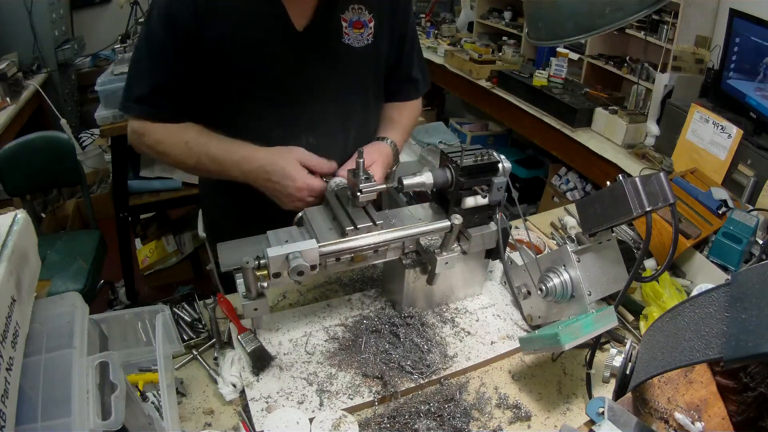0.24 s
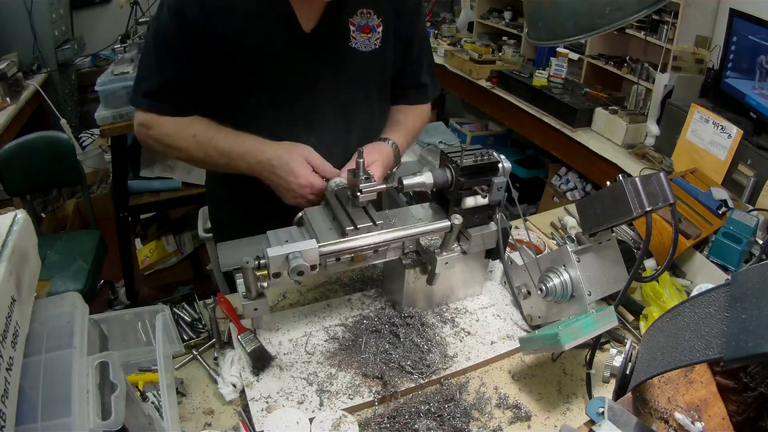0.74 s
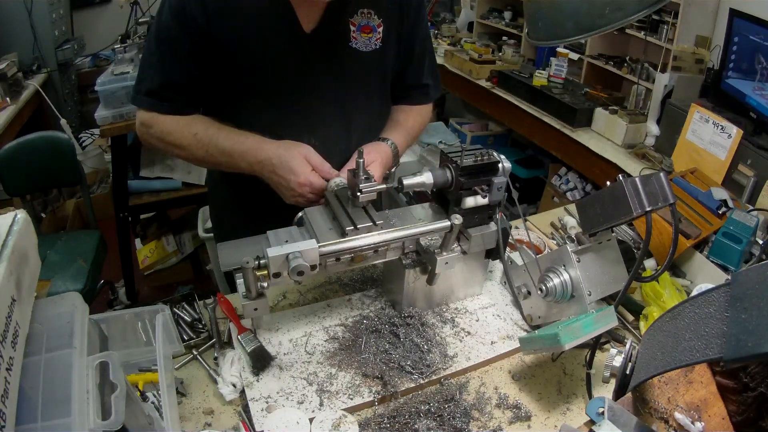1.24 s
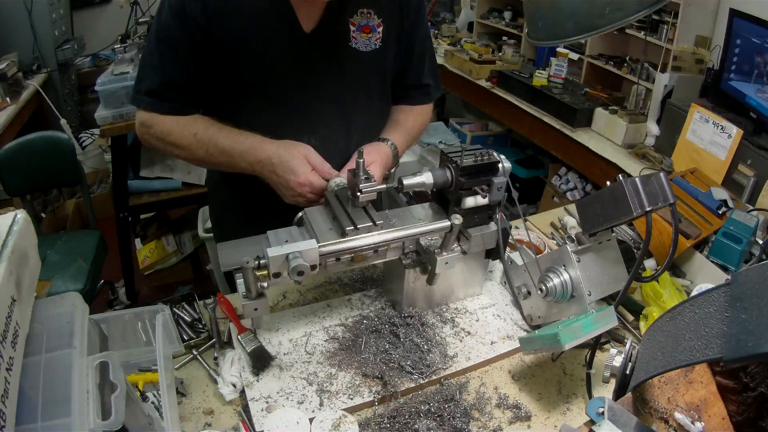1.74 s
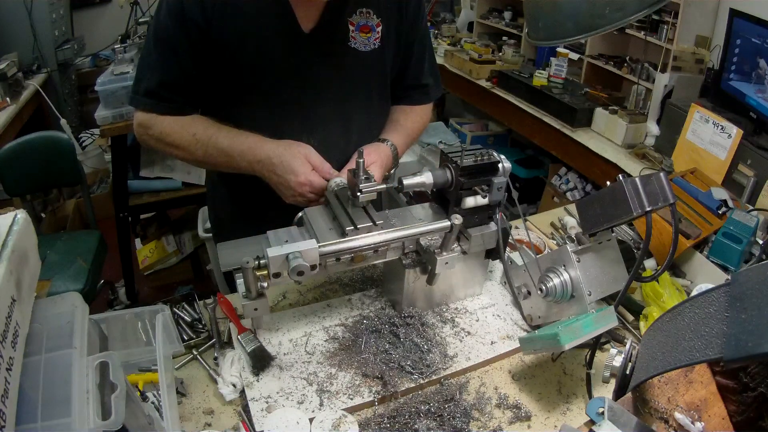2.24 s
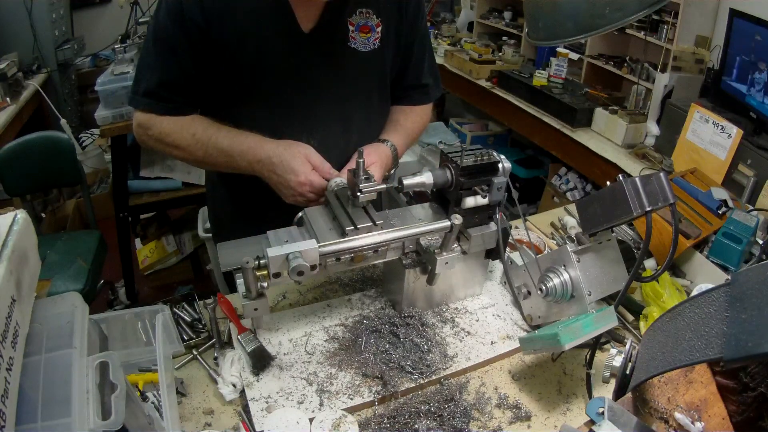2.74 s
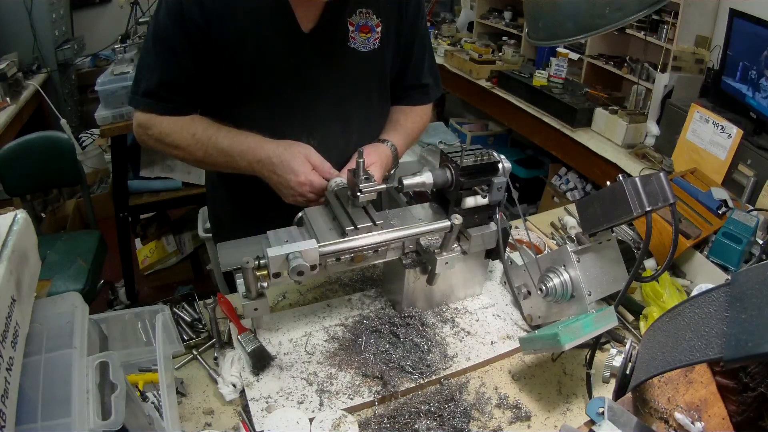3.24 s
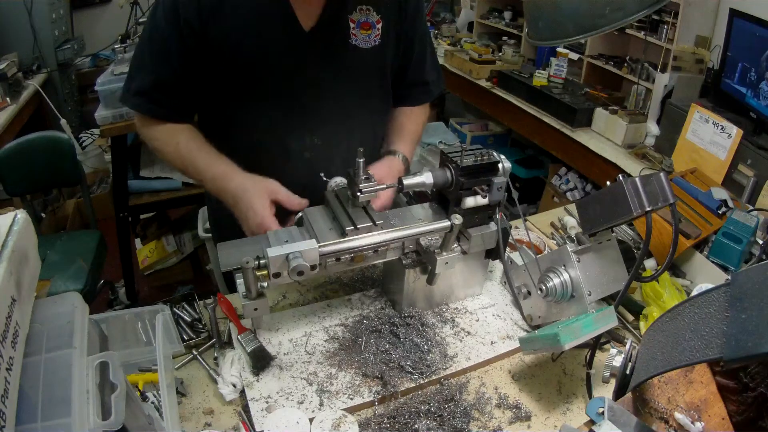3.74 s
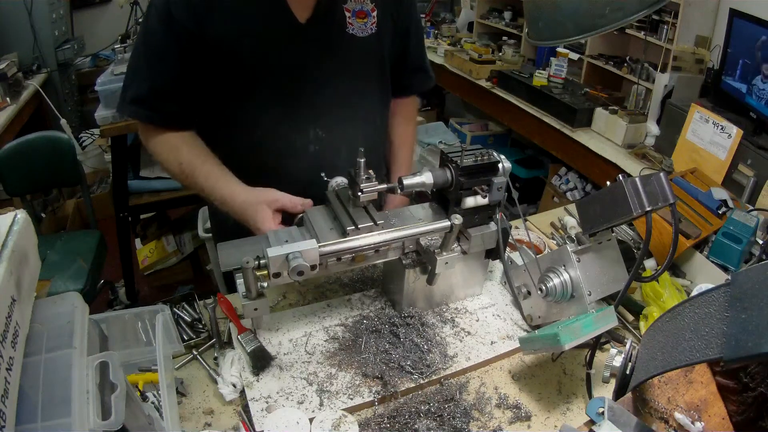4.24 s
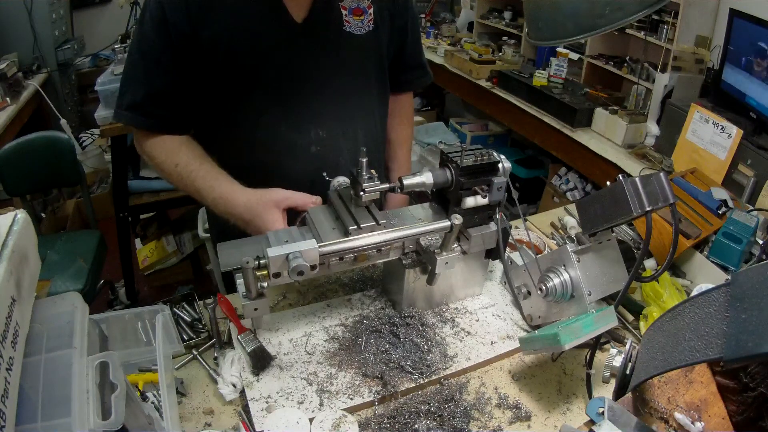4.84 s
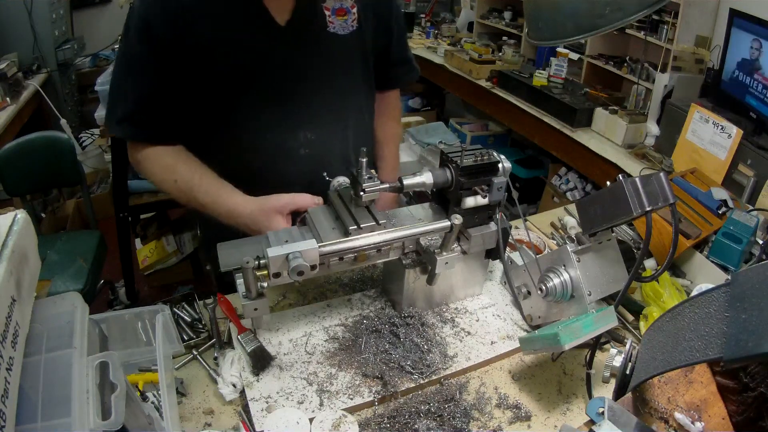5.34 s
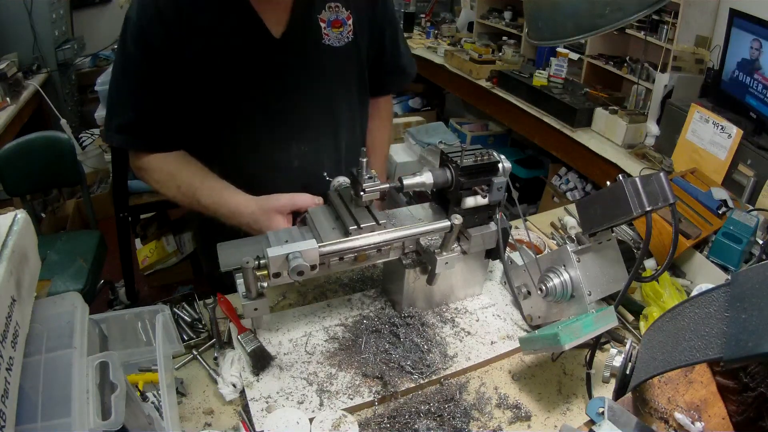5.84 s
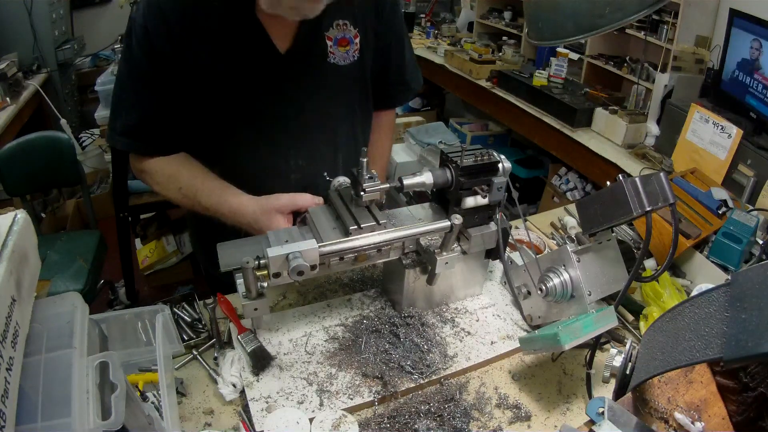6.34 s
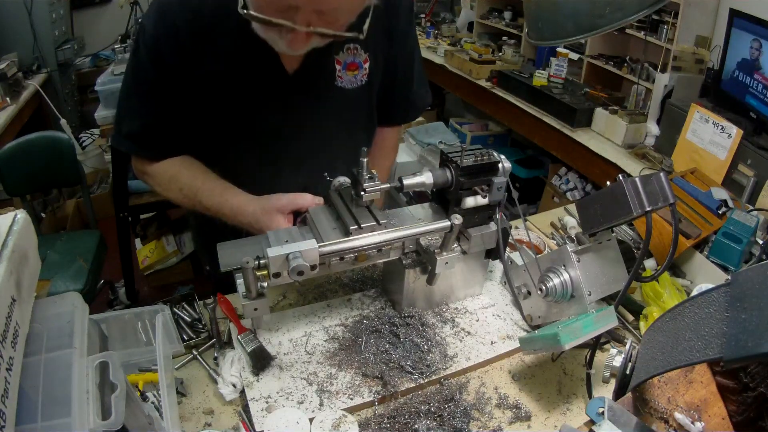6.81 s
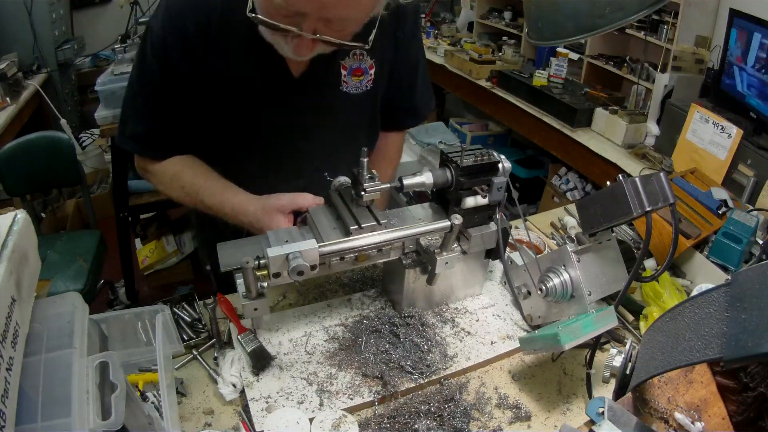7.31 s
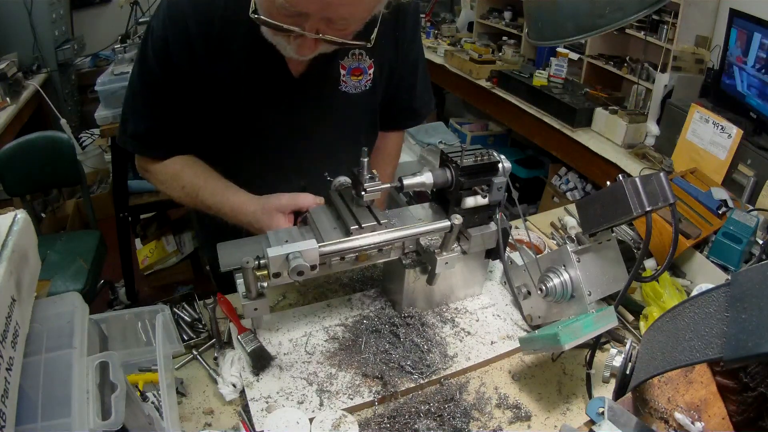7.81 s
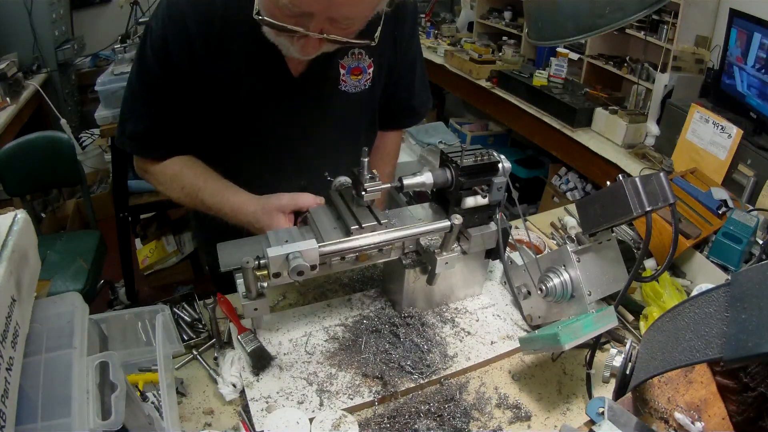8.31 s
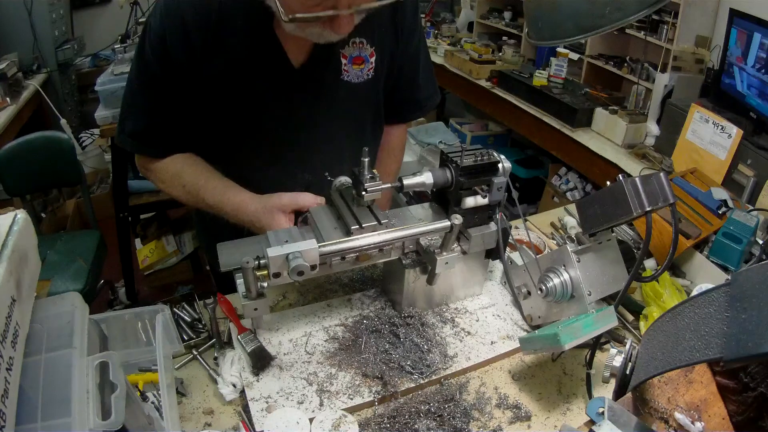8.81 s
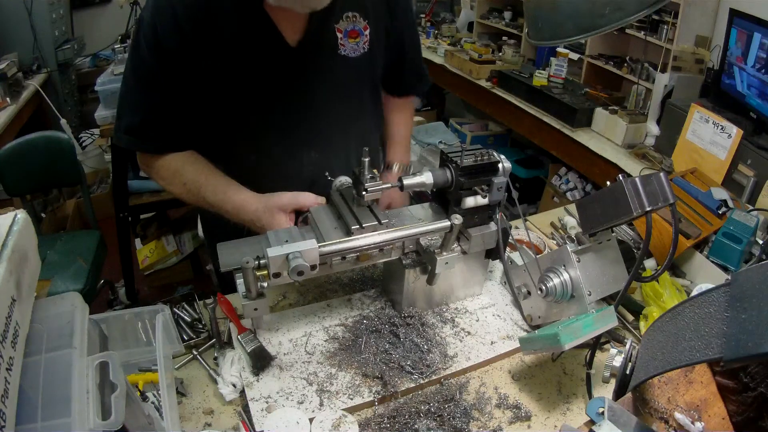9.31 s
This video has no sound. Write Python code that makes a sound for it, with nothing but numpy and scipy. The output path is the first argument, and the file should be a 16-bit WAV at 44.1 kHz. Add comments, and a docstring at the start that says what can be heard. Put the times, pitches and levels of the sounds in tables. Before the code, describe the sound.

Benchtop lathe motor whirring at speed, belt rasping about three times a second, until cutting begins with a loud, bright, sizzling scrape to the end.

```python
"""Home workshop: a small benchtop metal lathe settles at speed, then cuts, light at first and then deeper.
Shaft-locked sines and mains hum lie over filtered brush and bearing noise and a low rumble.
Noise bursts make the belt's scrape once a lap and its slaps; noise through tool modes makes the cut's hiss.
Both microphone ports hear the same sound; the right one loses the bass."""
import sys
import numpy as np
from scipy import signal
from scipy.fft import rfft, irfft, next_fast_len
from scipy.io import wavfile

SR = 44100
rng = np.random.default_rng(int(sys.argv[2]) if len(sys.argv) > 2 else 0)


def wav_out(sig):
    """Save sig, one row per channel (or a flat mono array), as 16-bit PCM at SR to the path in sys.argv[1]."""
    wavfile.write(sys.argv[1], SR, np.round(np.clip(np.atleast_2d(sig).T, -1, 1) * 32767).astype(np.int16))


N = 422037


def amp(db):
    """Decibels to gain."""
    return 10 ** (np.asarray(db) / 20)


def rms_one(x):
    """Scale to rms 1."""
    return x / np.sqrt(np.mean(x ** 2) + 1e-20)


def drift(corner_hz):
    """Slow random wander, rms about 1: noise through two equal one-pole low-passes at SR / 40, interpolated."""
    step, settle = 40, 2000
    pole = np.exp(-2 * np.pi * corner_hz * step / SR)
    noise = rng.standard_normal(N // step + settle + 2)
    slow = signal.lfilter([1], [1, -2 * pole, pole * pole], noise)[settle:]
    return np.interp(np.arange(N) / step, np.arange(len(slow)), rms_one(slow))


def colour(x, spectrum, peaks=(), peaks_db=0):
    """Filter noise by a smooth spectrum, log-interpolated in frequency, plus the power of resonance humps."""
    size = next_fast_len(N)
    hz = np.arange(size // 2 + 1) * SR / size + 1e-3   # offset avoids log(0)
    points = np.array(spectrum)
    level_db = np.interp(np.log(hz), np.log(points[:, 0]), points[:, 1])
    power = amp(level_db) ** 2
    for top_hz, width_hz, peak_db in peaks:
        hump = 1 / (1 + (2 * (hz - top_hz) / width_hz) ** 2) ** 2
        power += amp(peak_db + peaks_db) ** 2 * hump
    return irfft(rfft(x, size) * np.sqrt(power), size)[:N]


def shaft_tones(turns, load, waver_db, runout_rad, settle_db, load_db):
    """Sines locked to the motor turn; spindle run-out shifts the phase of high orders and swells the whine."""
    # tones on multiples of the motor turn: (order, base rms level/dB)
    orders = [(1, -69), (2, -78), (3, -84), (12, -70), (24, -70), (42, -78), (51, -79), (54, -79),
              (56, -77), (84, -57.5), (86, -68), (92, -72), (96, -70), (97, -72), (102, -74), (108, -70),
              (110, -70), (118, -73), (120, -68), (121, -70), (124, -74), (127, -66), (128, -67),
              (130, -61), (131, -68), (132, -64), (135, -64), (136, -60), (137, -70), (140, -70),
              (144, -70), (149, -71), (151, -61), (152, -63.5), (156, -68), (163, -72), (168, -75),
              (180, -73), (182, -80), (186, -80), (187, -78), (188, -74), (216, -84), (244, -91),
              (259, -89), (274, -88)]
    spindle_ratio = .24   # spindle turns per motor turn
    whine_swell_db, beat_db = 2.5, -76.5
    t = np.arange(N) / SR
    spindle = np.sin(2 * np.pi * spindle_ratio * turns)
    # belt beat: motor turn plus spindle turn
    out = np.sqrt(2) * amp(beat_db) * np.sin(2 * np.pi * (1 + spindle_ratio) * turns)
    settling_db = settle_db * np.exp(-t / .27)
    slot_growth_db = -16 * np.exp(-t / 1.8)   # the slot tone emerges slowly
    for order, base_db in orders:
        phase = 2 * np.pi * (order * turns + rng.random())
        level_db = base_db + waver_db * min(order / 310, 1) * drift(6.9)
        if order > 12:
            level_db = level_db + settling_db
        if order == 24:
            level_db = level_db + slot_growth_db
        if order == 84:   # the whine
            level_db = level_db + whine_swell_db * spindle
        if order > 90:
            phase += runout_rad * order / 100 * spindle
        if 90 < order < 200:   # this band fades under load
            level_db = level_db + load_db * load
        out += np.sqrt(2) * amp(level_db) * np.sin(phase)
    return out


def whirr(turns, flicker_db):
    """Brush and bearing noise; part of its treble is rotor roughness, repeated every motor turn."""
    # brushes and bearings: (f/Hz, relative density level/dB)
    brush_spectrum = [(350, -21), (600, -12), (979, -15.5), (1930, -10), (2440, -26.5), (2830, -16),
                      (3380, -4), (4750, -7.5), (5440, -1), (6410, -1), (8410, -16.5), (11700, -22),
                      (15500, -28.5)]
    # motor housing resonances: (f/Hz, width/Hz, level/dB before the hump gain)
    housing = [(2400, 52, -11), (3240, 23, -14), (3470, 45, 0), (3950, 49, -8), (4190, 23, -9),
               (4520, 110, -8), (4970, 48, -7), (5360, 41, -2), (5600, 57, -1), (6240, 52, -2),
               (6760, 49, -9), (7420, 96, -13), (7750, 41, -13), (10670, 40, -24), (11300, 60, -21)]
    # broad humps in the brush noise: (f/Hz, width/Hz, level/dB before the hump gain)
    far_treble = [(8970, 290, -20), (11100, 200, -29), (15000, 500, -32)]
    level_db, hump_gain_db, repeat_db = -50.5, 5, -4
    points_per_turn = 1024
    position = (turns * points_per_turn).astype(int) % points_per_turn
    roughness = rng.standard_normal(points_per_turn)[position]
    band = signal.butter(5, [4000, 13000], "band", fs=SR, output="sos")
    roughness = signal.sosfilt(band, roughness)
    fresh = amp(flicker_db * drift(20.0)) * rng.standard_normal(N)
    rub = fresh + amp(repeat_db) * roughness
    return amp(level_db) * rms_one(colour(rub, brush_spectrum, housing + far_treble, hump_gain_db))


def cutting(turns, load, depth, throb, lumpy_db, ring_db):
    """Chip tearing drives the tool's modes, which throb with the motor turn and swell in lumps over a hiss."""
    # chip tearing: (f/Hz, relative density level/dB)
    chip_spectrum = [(600, -38), (1000, -23), (1380, -23), (2130, -34), (2470, -14), (3200, -28),
                     (4090, -11), (4950, -9.5), (5750, -2.5), (6580, -18), (7500, -19), (9000, -24.5),
                     (9500, -32), (15500, -50)]
    # tool and work modes, light cut: (f/Hz, width/Hz, level/dB before ring_db)
    light_modes = [(4185, 120, -12), (4525, 40, -11), (4710, 40, -12), (5130, 40, -11), (5266, 40, -9),
                   (5432, 45, -6), (5590, 45, -5), (5673, 36, 1), (5862, 40, 0), (5970, 30, -7),
                   (6077, 40, -4), (6270, 30, -11), (7036, 70, -17), (7364, 60, -19), (7740, 50, -21)]
    # tool and work modes, deeper cut: (f/Hz, width/Hz, level/dB before ring_db)
    deep_modes = [(4150, 150, -10), (4525, 40, -11), (4920, 60, -8), (5225, 50, -7), (5381, 50, 0),
                  (5551, 40, -3), (5622, 50, -1), (5835, 50, -2), (5965, 50, -5), (6086, 40, -5),
                  (6270, 40, -6), (7030, 90, -16)]
    cut_db, deep_gain_db = -38, -0.5
    lumps = amp(lumpy_db * drift(39.0) + 0.2 * drift(6.2))
    bite = (1 + throb * np.sin(2 * np.pi * turns)) * lumps
    tearing = bite * rng.standard_normal(N)
    silent = [(1, -200), (2, -200)]   # modes only, no smooth spectrum
    light = colour(tearing, silent, light_modes, ring_db)
    deep = colour(tearing, silent, deep_modes, ring_db)
    hiss = colour(np.sqrt(bite) * rng.standard_normal(N), chip_spectrum)   # half the bite's dB swing
    mix = hiss + np.sqrt(1 - depth) * light + np.sqrt(depth) * deep
    return load * amp(cut_db + deep_gain_db * depth) * rms_one(mix)


def belt_rattle(load, grain_db):
    """Lumpy belt scrape swells, holds and fades each lap; slaps start short chatters; the guard colours both."""
    # belt scrapes its guard once a lap: (t/s, hold length/s, level/dB)
    laps = [(0.074, 0.074, -52), (0.368, 0.037, -50.5), (0.659, 0.096, -50), (0.977, 0.084, -50.9),
            (1.25, 0.098, -50), (1.551, 0.099, -50), (1.824, 0.07, -53), (2.12, 0.12, -53),
            (2.395, 0.07, -54), (2.704, 0.056, -51.5), (2.973, 0.081, -55), (3.273, 0.06, -52.9),
            (3.567, 0.074, -53), (3.83, 0.06, -51), (4.158, 0.071, -50), (4.42, 0.072, -51),
            (4.71, 0.061, -50.5), (5.002, 0.1, -53.5), (5.27, 0.11, -51.8), (5.578, 0.086, -50.5),
            (5.875, 0.049, -50), (6.15, 0.085, -48), (6.483, 0.042, -47), (6.73, 0.069, -50),
            (6.983, 0.15, -50.5), (7.287, 0.135, -51.5), (7.618, 0.051, -49.5), (7.948, 0.046, -48.5),
            (8.186, 0.096, -49.5), (8.42, 0.2, -56), (8.735, 0.076, -52.5), (9.038, 0.15, -53),
            (9.263, 0.25, -53)]
    # belt slaps: (t/s, peak level/dB)
    slaps = [(0.1171, -48), (0.6384, -53), (0.9717, -51), (1.239, -44), (1.288, -42.5), (1.6122, -43),
             (1.8442, -44), (2.1164, -42.5), (2.43, -45), (2.7417, -44), (2.9736, -47), (3.2864, -48),
             (4.1599, -49), (4.7626, -49), (5.9165, -47), (6.1479, -48), (6.536, -43), (7.3766, -43),
             (8.0267, -53), (8.4223, -49), (8.552, -46), (8.7929, -42.5)]
    # belt guard: (f/Hz, relative density level/dB)
    guard_spectrum = [(600, -27.5), (1000, -16), (1300, -14), (1900, -17), (2500, -11.5), (3000, -11.5),
                      (4300, -9.5), (5500, -8.5), (7000, -13), (9000, -45)]
    # belt guard resonances: (f/Hz, width/Hz, level/dB before the hump gain)
    guard_modes = [(1240, 70, 3), (1360, 60, 3), (1440, 50, 1), (1730, 40, 1), (2450, 100, 4),
                   (2560, 80, 3), (2680, 60, 3), (3960, 170, 3), (4490, 150, 3)]
    rise_db_per_s, fall_db_per_s, slap_t60_s = 164, 115, .072
    rubbing_db, rubbing_load_db = -61, 6.5   # light rubbing all the way round, stronger under load
    t = np.arange(N) / SR
    power = amp(2 * (rubbing_db + rubbing_load_db * load))   # dB doubled: power
    for start_s, length_s, level_db in laps:
        end_s = start_s + length_s
        near = slice(max(round((start_s - .3) * SR), 0), round((end_s + .3) * SR))
        early_s = np.maximum(start_s - t[near], 0)
        late_s = np.maximum(t[near] - end_s, 0)
        power[near] += amp(2 * (level_db - rise_db_per_s * early_s - fall_db_per_s * late_s))
    for slap_s, peak_db in slaps:
        i = round(slap_s * SR)
        age_s = np.arange(min(N - i, SR // 2)) / SR
        power[i:i + len(age_s)] += amp(2 * (peak_db - 60 * age_s / slap_t60_s))
    grain = rng.standard_normal(N) * amp(grain_db * drift(59.0))
    chatter = np.sqrt(power) * rms_one(grain)
    return np.std(chatter) * rms_one(colour(chatter, guard_spectrum, guard_modes, -11.5))


def mains_hum(load):
    """Magnetic hum: sines on multiples of 120 Hz, each crossing from idle to cutting level with the load."""
    # rectified mains: (f/Hz, idle rms level/dB, cutting rms level/dB)
    lines = [(120, -77, -76), (240, -70, -69), (360, -70, -72), (480, -68, -69), (840, -80, -76),
             (960, -80, -77), (1440, -85, -73), (1560, -73, -75), (1680, -79, -81), (2040, -80, -75),
             (2160, -74, -75), (2280, -77, -82), (2400, -71, -62), (2520, -71, -66), (2640, -77, -90),
             (3240, -76, -75), (3360, -72, -75), (3600, -72, -69), (3720, -75, -77), (3960, -71, -73),
             (4080, -83, -74), (4200, -77, -90), (3480, -80, -61)]
    out, t = np.zeros(N), np.arange(N) / SR
    for hz, idle_db, cutting_db in lines:
        gain = amp(idle_db) + load * (amp(cutting_db) - amp(idle_db))
        out += np.sqrt(2) * gain * np.sin(2 * np.pi * (hz * t + rng.random()))
    return out


def rumble():
    """Steady low noise coloured by bench resonances."""
    # low rumble: (f/Hz, relative density level/dB)
    low_spectrum = [(20, 5), (32, -3), (60, -16), (100, -4.5), (170, -7), (300, -14), (450, -8.5),
                    (620, -13), (780, -6), (930, -15)]
    # bench resonances: (f/Hz, width/Hz, level/dB before the hump gain)
    bench = [(521, 12, 0), (711, 25, 0), (880, 25, -3), (1090, 30, -3)]
    level_db = -67
    spectrum = [(10, -42)] + low_spectrum + [(1500, -54)]
    return amp(level_db) * rms_one(colour(rng.standard_normal(N), spectrum, bench, 0.12))


def scene():
    """Sum all sources, driven by one motor speed, load and cut depth; both ports get the same signal."""
    # speed still to gain, dying away exponentially: (f/Hz, time constant/s)
    run_up = [(1.3, .62), (.2, 2.2)]
    touch_s, bite_s = 6.43, .065   # tool meets work; time constant of its bite
    deepen_s, deepen_length_s = 9.05, .27
    full_speed_hz, load_sag_hz = 41.295, .15   # motor turns a second, idling; loss under load
    sag_lag_s = .08   # rotor inertia
    t = np.arange(N) / SR
    load = (1 - np.exp(-np.maximum(t - touch_s, 0) / bite_s)) ** 2
    depth = np.clip((t - deepen_s) / deepen_length_s, 0, 1)
    to_gain_hz = sum(hz * np.exp(-t / tau_s) for hz, tau_s in run_up)
    sag_hz = load_sag_hz * np.interp(t - sag_lag_s, t, load)
    speed_hz = full_speed_hz - to_gain_hz - sag_hz
    turns = np.cumsum(speed_hz * (1 + .0001 * drift(3.0))) / SR
    lathe = shaft_tones(turns, load, waver_db=2.5, runout_rad=0.18, settle_db=-0.5, load_db=-15.0)
    lathe += whirr(turns, flicker_db=.5)
    lathe += cutting(turns, load, depth, throb=0.092, lumpy_db=1.0, ring_db=6.5)
    lathe += belt_rattle(load, grain_db=2.0)
    lathe += mains_hum(load)
    lathe += rumble()
    return np.array([lathe, lathe])


def record(dry):
    """The right port rolls off the bass, each port adds a faint treble hiss, the top is cut."""
    right_bass_cut_hz, alike_above_hz, cutoff_hz, hiss_db = 148, 800, 15300, -78
    left, right = dry
    lost = right - signal.lfilter(*signal.butter(1, right_bass_cut_hz, "high", fs=SR), right)
    # above 800 Hz the two channels stay alike
    lost = signal.sosfiltfilt(signal.butter(4, alike_above_hz, fs=SR, output="sos"), lost)
    treble = signal.butter(4, 12500, "high", fs=SR, output="sos")
    hiss = signal.sosfilt(treble, rng.standard_normal((2, N)))
    wet = np.array([left, right - lost]) + amp(hiss_db) * hiss
    return signal.sosfilt(signal.ellip(16, .5, 60, cutoff_hz, fs=SR, output="sos"), wet)


dry = scene()
out = record(dry)
wav_out(out)
```